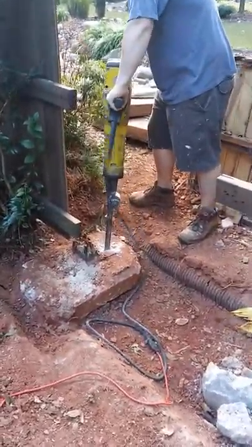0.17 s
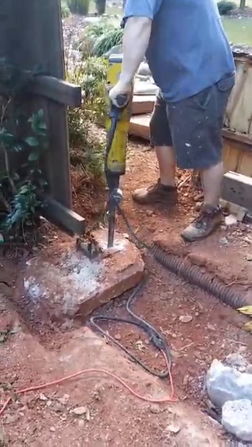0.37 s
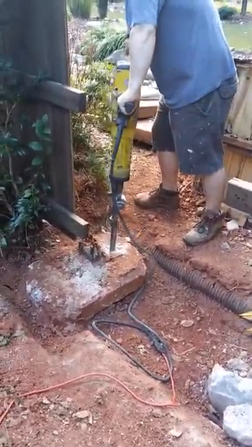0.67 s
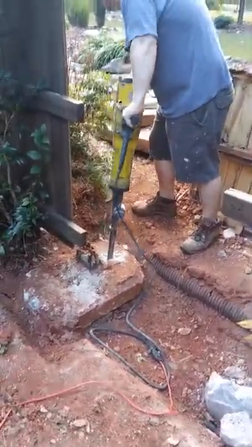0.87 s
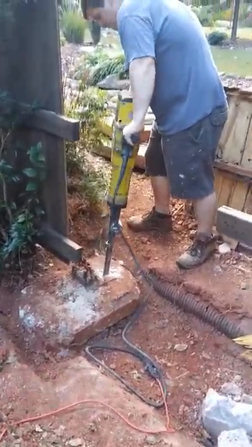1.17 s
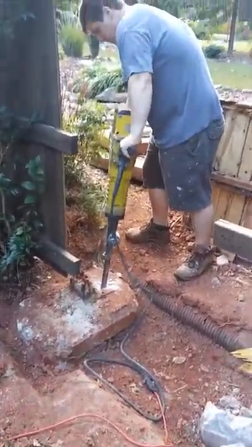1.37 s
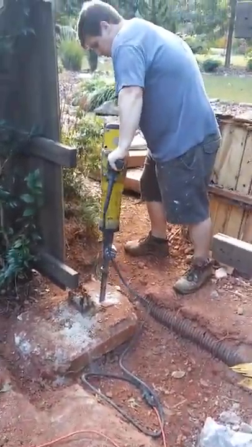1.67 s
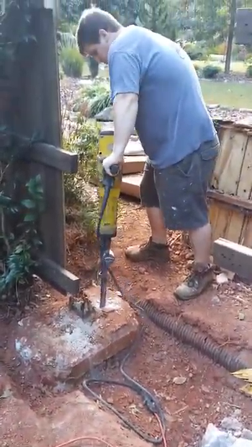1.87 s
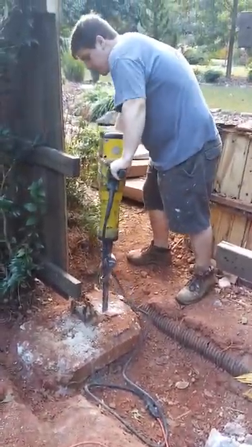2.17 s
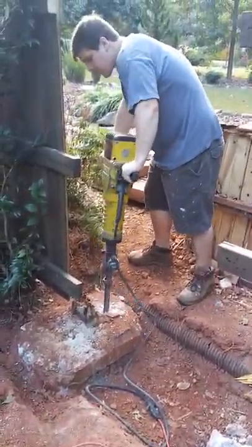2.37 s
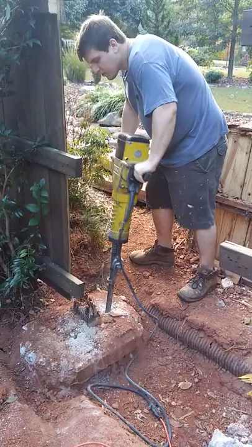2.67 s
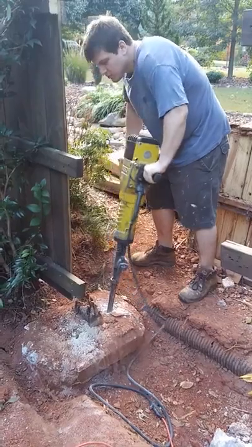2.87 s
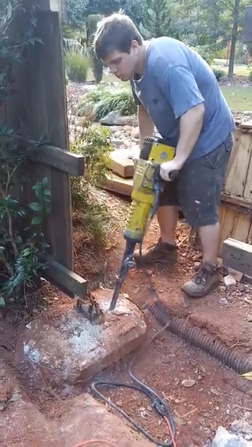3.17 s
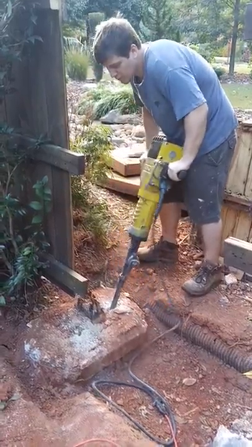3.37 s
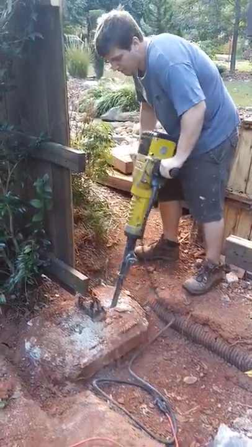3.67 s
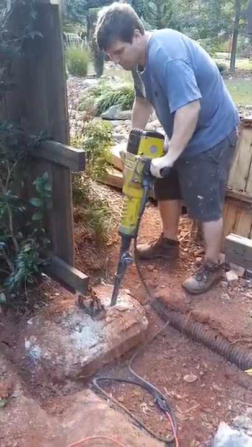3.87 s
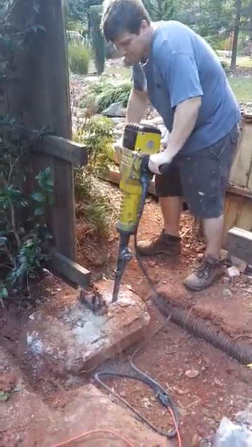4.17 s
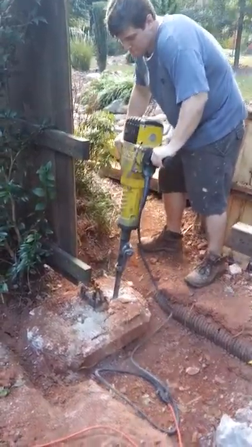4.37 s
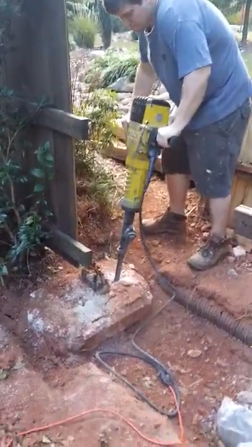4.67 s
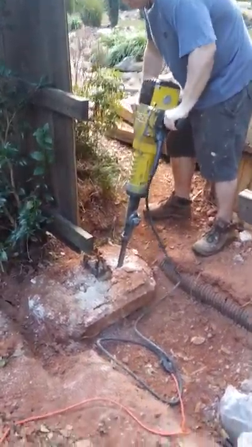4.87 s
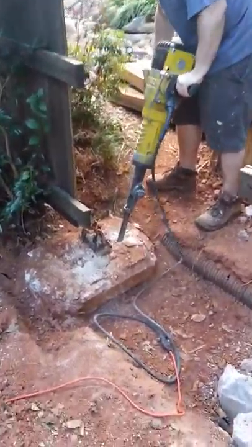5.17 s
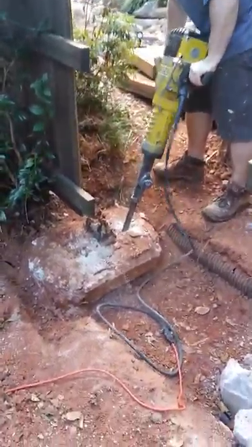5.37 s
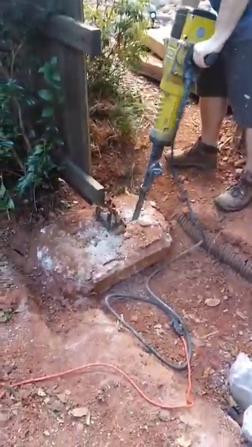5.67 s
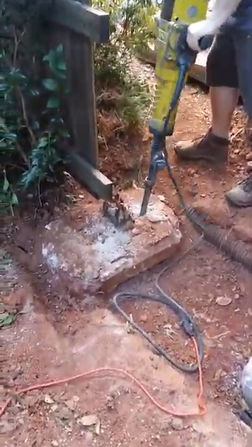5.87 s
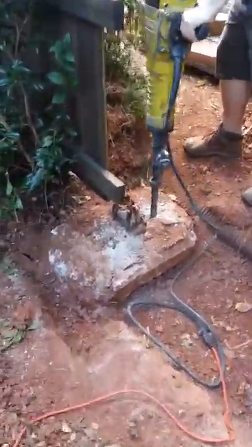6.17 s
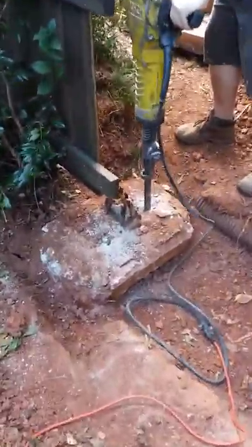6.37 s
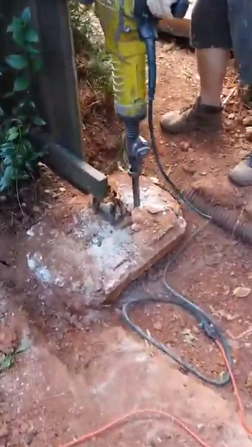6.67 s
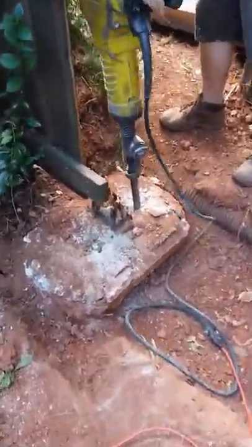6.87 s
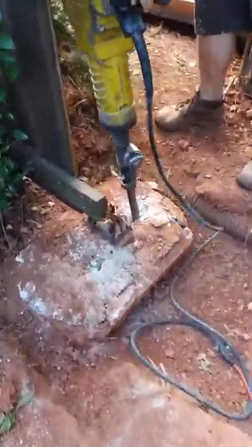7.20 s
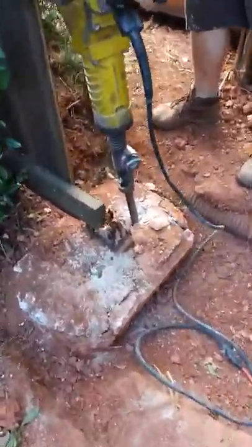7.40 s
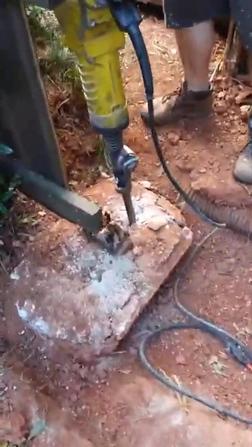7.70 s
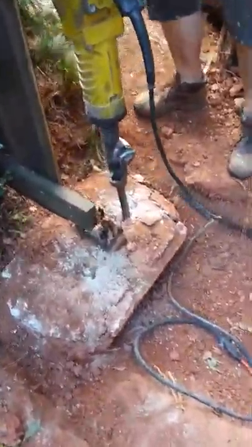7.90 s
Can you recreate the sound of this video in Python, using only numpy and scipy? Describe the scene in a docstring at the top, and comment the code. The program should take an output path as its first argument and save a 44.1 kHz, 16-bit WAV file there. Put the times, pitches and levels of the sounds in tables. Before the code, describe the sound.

Loud, close hammering of steel on concrete at about thirteen blows a second, with metallic ring and gear whine, before the machine coasts down.

```python
"""Rapid hammering, about 13 blows a second: an electric jackhammer breaks a concrete slab in a yard, then coasts down.
Each blow cracks on concrete (shaped noise), adds a dull low burst (impulses) and rings the steel bit and barrel.
Gear harmonics whine and sag on every compression stroke over fan noise; after switch-off the gears whirr in surges.
Loose clacks, falling chips, a low shudder and a faint yard complete it. The close microphone overloads softly,
and a look-ahead limiter ducks just before each peak."""
import sys
import numpy as np
from scipy import signal
from scipy.fft import rfft, irfft, next_fast_len
from scipy.io import wavfile
from scipy.ndimage import uniform_filter1d, minimum_filter1d

SR = 44100
rng = np.random.default_rng(int(sys.argv[2]) if len(sys.argv) > 2 else 0)


def put_to_file(sound):
    """Save the sound as 16-bit audio at rate SR, in the file named by the first command-line argument."""
    columns = np.atleast_2d(sound).T  # one column per channel
    safe = np.clip(columns, -1, 1)
    whole_steps = np.round(safe * 32767)
    wavfile.write(sys.argv[1], SR, whole_steps.astype(np.int16))


N = 354519
TIME = np.arange(N) / SR  # s

# All levels in the tables are relative.

# Pace of the crank, each value held until the next row: (time [s], rate [blows/s])
CRANK_PACE = [(-0.0363, 13.037), (0.3473, 12.696), (0.5048, 12.871), (1.4371, 12.737), (1.8297, 12.521),
              (3.1873, 12.971), (4.0354, 12.655), (4.4305, 12.855), (4.7417, 12.698), (5.4505, 13.079),
              (5.6798, 13.121), (6.2896, 12.731), (6.918, 11.364), (7.006, 9.033), (7.1167, 7.418),
              (7.2515, 5.092)]


def blow_times():
    """Crank kinematics: the striker lands each time the integrated rate completes a turn."""
    start_s, blows_per_s = np.transpose(CRANK_PACE)
    turns_per_row = blows_per_s[:-1] * np.diff(start_s)
    turns = np.concatenate([[0], np.cumsum(turns_per_row)])
    return np.interp(np.arange(round(turns[-1]) + 1), turns, start_s)


# Force of the striker, weakening as the motor slows: (time [s], level [dB])
STRIKER_FORCE = [(-.04, -4.5), (.03, -1.5), (7, 0.5), (7.12, -3), (7.25, -9)]
# Nominal modes of the steel bit, before shift and damping: (frequency [Hz], level [dB], decay by 60 dB [s])
BIT_MODES = [(4015, -28, .3), (4835, -17, .25), (5375, -19, .18), (6950, -1, .11), (7465, -17, .5),
             (8105, -17, .4), (8665, -14, .3), (9275, -11, .25), (9393, -8, .28), (10140, -14, .22),
             (10557, -13, .28), (11336, -27, .25), (11865, -23, .22), (12037, -15, .21), (14376, -30, .2),
             (14871, -21, .24), (15272, -25, .24)]
# How freely the low modes ring as the bit shifts in its seat: (time [s], level [dB])
LOW_MODE_RING = [(0.04, 3.5), (2.23, -1), (3.19, -0.5), (3.34, -4), (4.59, 3), (4.9, -3), (5.98, 1),
                 (6.29, -3.5), (7.12, -1)]
# The same for the high modes: (time [s], level [dB])
HIGH_MODE_RING = [(0.04, 7), (0.35, 2), (1.13, 10), (1.44, -11), (1.59, 3), (2.71, -1), (2.87, -1),
                  (3.34, 12), (3.96, 2), (5.53, 11), (6.29, -1), (6.45, 6), (6.6, 6), (6.92, 9.6),
                  (7.12, 6)]


def bit(level_db=-0.5, chatter_s=0.026, chatter=0.66, scatter_db=1.5, seating_db=1.5,
        high_damping=1.4, detune=.0018, beating=1.1):
    """Modal synthesis: each blow and its chatter on the slab excite modes that every new seating shifts slightly."""
    blows = blow_times()
    count = len(blows)
    ring_curves = np.array([curve(LOW_MODE_RING, blows), curve(HIGH_MODE_RING, blows)])
    low_db, high_db = ring_curves + seating_db * rng.standard_normal((count, 2)).T
    latest_blow = np.maximum(np.searchsorted(blows, TIME) - 1, 0)
    out = np.zeros(N)
    for hz, mode_db, t60 in BIT_MODES:
        # the blow itself, then two later contacts
        contacts = blows[:, None] + chatter_s * rng.random((count, 3)) * np.arange(3) / 2
        luck, shift = rng.standard_normal((count, 2)).T
        high_share = np.interp(hz, [9500, 11500], [0, 1])
        ring_db = high_share * (high_db - low_db) + low_db
        blow_gain = gain_of(mode_db + ring_db + curve(STRIKER_FORCE, blows) + scatter_db * luck)
        sizes = blow_gain[:, None] * np.array([1, chatter, chatter])
        shifted_hz = hz * (1 + detune * shift[latest_blow])
        out += mode(contacts, sizes, shifted_hz, t60 / high_damping ** high_share, beating)
    return gain_of(level_db) * out


def barrel(clang, level_db=2.5, t60=0.42, scatter_db=0.5):
    """High modal density: countless close modes act as decaying noise that lasts into the next blow."""
    blows = blow_times()
    blow_db = level_db + curve(STRIKER_FORCE, blows) + scatter_db * rng.standard_normal(len(blows))
    return clang * bursts(blows, blow_db, t60)


# Crack of steel on concrete: (frequency [Hz], spectral level [dB per Hz])
CRACK_SPECTRUM = [(60, -41), (200, 3.5), (600, 0.5), (2000, 1), (5000, 8.5), (9000, -5.5), (12000, 7),
                  (15500, -6.5)]
# Level of the dull low burst: (time [s], level [dB])
LOW_BURST_LEVEL = [(0.04, 2.5), (0.35, 7), (0.5, 1.5), (1.28, 5), (1.44, -2.5), (1.59, 3.5), (2.23, -0.5),
                   (2.39, 3.5), (2.71, -0.4), (4.11, 5.5), (4.27, 3), (4.43, -4), (5.21, 5), (5.37, 3),
                   (7.12, 2), (7.25, -18)]


def concrete(crack_db=0, crack_t60=0.12, low_burst_db=19, low_burst_s=.014,
             recoil_db=-41, recoil_s=0.037, scatter_db=1.2, count=14):
    """Impact noise: a sharp crack, a dull low burst as from an overloaded microphone, then a recoil thump."""
    blows = blow_times()
    blows = blows[blows > 0]
    force_db = curve(STRIKER_FORCE, blows)
    burst_db = curve(LOW_BURST_LEVEL, blows) + scatter_db * rng.standard_normal(len(blows))
    crack = bursts(blows, crack_db + force_db, crack_t60) * noise(CRACK_SPECTRUM)

    burst_times = blows[:, None] + low_burst_s * rng.random((len(blows), count))
    sizes = rng.standard_normal((len(blows), count))
    sizes /= sizes.std(1, keepdims=True)  # equal spread in every blow
    sizes *= gain_of(low_burst_db + burst_db + force_db)[:, None]
    low_burst = band(clicks(burst_times, sizes) + 1e-12, 203, 1350)
    low_burst = band(low_burst, 130, 3300)

    # the machine falls back on the bit
    thump = noise([(25, -18), (95, 5), (200, -12), (900, -50)])
    recoil = bursts(blows + recoil_s, recoil_db + force_db, 0.099) * thump
    return crack + low_burst + recoil


# Clacks of the loose bit as the machine runs down: (time [s], level [dB], decay by 60 dB [s])
LOOSE_CLACKS = [(7.4479, 0.5, 0.1), (7.747, -8.5, 0.093)]
# Modes of the bit holder: (frequency [Hz], level [dB], decay by 60 dB [s])
HOLDER_MODES = [(4070, -20, 0.1), (4720, -7, 0.047), (5679, -6.5, 0.037), (7700, -11, 0.094),
                (8027, -7.5, 0.11), (9362, -5, 0.076)]


def holder(clang, ring_db=1, clang_db=-5, crack_db=-5, after_db=-25, after_t60=0.79):
    """Free impact: the undriven bit clacks and excites the holder's modes; the barrel sings on faintly."""
    times, clack_db, _ = np.transpose(LOOSE_CLACKS)
    ring = np.zeros(N)
    for hz, mode_db, t60 in HOLDER_MODES:
        ring += mode(times, gain_of(clack_db + mode_db), hz, t60, beating=0.35)
    fade = sum(bursts([at], [peak_db], t60) for at, peak_db, t60 in LOOSE_CLACKS)
    barrel_fade = gain_of(clang_db) * fade + bursts(times, clack_db + after_db, after_t60)
    crack = fade * band(noise(CRACK_SPECTRUM), 150, 8100)
    return gain_of(ring_db) * ring + barrel_fade * clang + gain_of(crack_db) * crack


# Rush of the motor's fan and gears: (frequency [Hz], spectral level [dB per Hz])
RUSH_SPECTRUM = [(25, -30.5), (60, -23), (130, -16), (210, -3.5), (320, 2), (480, -8), (750, 0.5),
                 (1000, -2.5), (1600, 2), (3200, 3), (4600, 1.5), (5800, -5), (9000, -3.5), (15000, -30)]
# Motor noise under power, then dying away after switch-off: (time [s], level [dB])
MOTOR_LEVEL = [(0, -10.5), (1, -13.5), (4, -14.5), (6, -14.5), (6.6, -12), (7.1, -11), (7.22, -16),
               (7.25, -26), (7.6, -39), (8.04, -41)]
# Strength of the gear whine: (time [s], level [dB])
WHINE_LEVEL = [(0, -21.5), (1, -19), (2, -23.5), (3, -18.5), (3.7, -23), (4.3, -19.5), (4.8, -18.5),
               (5.3, -20.5), (6, -17), (6.8, -21), (7.2, -34), (7.6, -59), (8, -46)]
# One crank turn from blow to blow: (phase [share of turn], speed [factor], gear load [dB])
CRANK_STROKE = [(0, .92, 8.5), (.15, .96, -7.5), (.55, 1.03, -10.5), (.7, 1.025, 0.5), (.81, .995, 2),
                (.92, .94, 3.5), (1, .92, -13)]
# Harmonics of the gear mesh: (multiple of mesh frequency, level [dB])
MESH_HARMONICS = [(1, -8), (2, -12), (3, -2.5)]
# Resonances of the housing: (frequency [Hz], bandwidth [Hz], level [dB])
HOUSING_PEAKS = [(1560, 32, -12), (2257, 80, -0.5), (3000, 77, -11), (4796, 79, 5.5)]
MESHES_PER_BLOW = 127
SWITCH_OFF_S = 7.2


def motor(rush_db=-3, load_share=0.13, singing_share=0.45, flutter=0.00494,
          stroke_scatter_db=0.8, tooth_rough=0.51, patchy_db=4.0):
    """Gear-mesh frequency modulation: compressing the air cushion loads and slows the gears; the housing resonates."""
    # the last turn would end after the sound does
    turns_at = np.concatenate([blow_times(), np.transpose(LOOSE_CLACKS)[0], [8.35]])
    turns = np.interp(TIME, turns_at, np.arange(len(turns_at)))
    turns_per_s = np.interp(TIME, (turns_at[1:] + turns_at[:-1]) / 2, 1 / np.diff(turns_at))
    speed = curve(CRANK_STROKE, turns % 1)
    load_db = curve(CRANK_STROKE, turns % 1, axis=2)

    mesh_hz = MESHES_PER_BLOW * turns_per_s * speed * (1 + flutter * wander(200))
    angle = 2 * np.pi * np.cumsum(mesh_hz) / SR
    luck_db = stroke_scatter_db * rng.standard_normal(len(turns_at))[turns.astype(int)]
    teeth = np.zeros(N)
    for multiple, db in MESH_HARMONICS:
        # uneven teeth roughen every harmonic
        roughness = 1 + tooth_rough * wander(180)
        teeth += gain_of(db) * roughness * np.sin(round(multiple) * angle)
    whine = gain_of(curve(WHINE_LEVEL) + load_db + luck_db) * evened(teeth)

    powered = np.interp(TIME - SWITCH_OFF_S, [0, .1], [1, 0])
    running = gain_of(curve(MOTOR_LEVEL)) + coasting()
    level_db = 20 * np.log10(running) + rush_db + load_share * load_db * powered
    drive = whine + gain_of(level_db) * patchy(noise(RUSH_SPECTRUM), patchy_db)
    housing = np.zeros(N)
    for hz, width_hz, db in HOUSING_PEAKS:
        b, a = signal.iirpeak(hz, hz / width_hz, fs=SR)
        housing += gain_of(db) * signal.lfilter(b, a, drive)
    return drive + housing + singing(level_db + singing_share * load_db * powered, powered)


# Whirring surges of the coasting gears, one a slow piston stroke: (start [s], length [s], level [dB])
COASTING_SURGES = [(7.251, 0.1, -18), (7.352, 0.092, -22), (7.44, .14, -19), (7.59, 0.15, -34.5),
                   (7.726, 0.047, -31), (7.783, 0.19, -30.5)]


def coasting(peak_share=0.33, roundness=0.8):
    """Amplitude modulation: each slow stroke makes the gain swell to a peak and sink again."""
    gain = np.zeros(N)
    for start_s, length_s, db in COASTING_SURGES:
        arch = np.interp((TIME - start_s) / length_s, [0, np.clip(peak_share, .1, .9), 1], [0, 1, 0])
        gain += gain_of(db) * np.sin(np.pi / 2 * arch) ** roundness
    return gain


# Sharp casing resonances:
# (frequency [Hz], sway rate [points/s], level under power [dB], level while coasting [dB])
CASING_RESONANCES = [(2277, 130, -15, -6), (4843, 60, -3.5, -13)]


def singing(drive_db, powered):
    """Sustained resonance: gear drive keeps the casing ringing, as tones of randomly swaying amplitude and phase."""
    out = np.zeros(N)
    for hz, points_per_s, powered_db, coasting_db in CASING_RESONANCES:
        sway = wander(points_per_s) + 1j * wander(points_per_s)
        level_db = drive_db + powered * powered_db + (1 - powered) * coasting_db
        out += gain_of(level_db) * (sway * np.exp(2j * np.pi * hz * TIME)).real
    return out


# Small chips of concrete settling: (time [s], level [dB])
CHIP_TICKS = [(7.86, -54), (7.909, -27), (7.954, -35), (7.995, -38), (8.009, -29)]


def chips(t60=0.028):
    """Light impacts: small chips give tiny bright bursts of noise."""
    times, db = np.transpose(CHIP_TICKS)
    tick = noise([(1000, -30), (5000, -16), (6200, -14), (8300, 9), (10500, -11), (15500, -15)])
    return bursts(times, db, t60) * tick


# Low hum of the last slow turns: (time [s], level [dB])
HUM_LEVEL = [(7.6, -75), (7.9, -65), (8.0, -48), (8.04, -42)]


def shake(level_db=-41, hum_hz=210):
    """Forced vibration: the driven machine shudders as low noise, and hums on one tone in its last turns."""
    powered = np.interp(TIME, [7.1, 7.35], [1, .15])
    rumble = noise([(20, -16), (50, -19), (90, 2.0), (170, -3), (400, -8), (1500, -60)])
    shudder = gain_of(level_db) * powered * rumble
    hum = np.sqrt(2) * np.sin(2 * np.pi * hum_hz * TIME)  # rms 1
    return shudder + gain_of(curve(HUM_LEVEL)) * hum


def yard(level_db=-53):
    """Stationary ambient noise: a faint outdoor background of fixed spectrum."""
    air = noise([(30, -16), (120, -4), (220, -6), (500, 12), (2000, -3), (8000, -35), (15000, -26)])
    return gain_of(level_db) * air


def gain_of(db):
    """Decibel law: 20 dB is a factor of ten in amplitude."""
    return 10 ** (np.asarray(db) / 20)


def evened(x):
    """Power normalization: scales to rms 1."""
    return x / np.sqrt(np.mean(x ** 2) + 1e-20)


def curve(rows, at=TIME, axis=1):
    """Linear interpolation: joins the rows of a table by straight lines."""
    rows = np.asarray(rows, float)
    return np.interp(at, rows[:, 0], rows[:, axis])


def noise(spectrum):
    """Spectral shaping: weights the transform of white noise, then scales to rms 1."""
    size = next_fast_len(N, True)
    hz, db = np.transpose(spectrum)
    log_hz = np.log(np.fft.rfftfreq(size, 1 / SR) + 1)
    shape = gain_of(np.interp(log_hz, np.log(hz), db))
    white = rng.standard_normal(size)
    return evened(irfft(rfft(white) * shape, size)[:N])


def clicks(times, sizes):
    """Impulsive excitation: single impulses at the given times."""
    train = np.zeros(N, np.asarray(sizes).dtype)
    places = np.clip(np.ravel(times) * SR, 0, N - 1).astype(int)
    np.add.at(train, places, np.ravel(sizes))
    return train


def dying(train, t60):
    """Exponential damping: every impulse leaves a tail that shrinks a thousandfold in t60 seconds."""
    return signal.lfilter([1], [1, -np.exp(-np.log(1000) / (t60 * SR))], train)


def bursts(times, db, t60):
    """Incoherent addition: envelope of decaying bursts whose powers add."""
    # power shrinks a thousandfold in half the time that amplitude does
    return np.sqrt(dying(clicks(times, gain_of(db) ** 2) + 1e-18, t60 / 2))


def mode(times, sizes, hz, t60, beating=0, beats_per_s=70):
    """Damped oscillator struck with random phase; close neighbours and echoes make it swell and fade."""
    kicks = sizes * np.exp(2j * np.pi * rng.random(np.shape(sizes)))
    ring = dying(clicks(times, kicks) + 1e-12, t60)
    cycles = np.cumsum(hz * np.ones(N)) / SR
    angle = (2 * np.pi * (cycles % 1)).astype(np.float32)
    sway = wander(beats_per_s) + 1j * wander(beats_per_s)
    ring = ring * (1 + beating * sway) / np.sqrt(1 + 2 * beating ** 2)
    return np.sqrt(2) * (ring.real * np.cos(angle) - ring.imag * np.sin(angle))


def band(x, low_hz, high_hz):
    """Causal band-pass filtering, steeper on the low side."""
    x = signal.sosfilt(signal.butter(2, low_hz, "high", fs=SR, output="sos"), x)
    return signal.sosfilt(signal.butter(1, high_hz, fs=SR, output="sos"), x)


def wander(per_s):
    """Random modulation: joins per_s random points a second by lines, with rms about 1."""
    points = rng.standard_normal(2000)
    return np.interp(TIME * per_s, np.arange(len(points)), points) * np.sqrt(3 / 2)


def patchy(x, depth_db):
    """Time-frequency modulation: patches of about 300 Hz by 12 ms flare and fade at random, making noise grainy."""
    z = signal.stft(x, nperseg=512, noverlap=384)[2]
    patches = uniform_filter1d(rng.standard_normal(z.shape), size=4, axis=0)
    patches = uniform_filter1d(patches, size=4, axis=1)
    z = z * gain_of(depth_db * evened(patches))
    return evened(signal.istft(z, nperseg=512, noverlap=384)[1][:N])


# Dense ring of the steel barrel: (frequency [Hz], spectral level [dB per Hz])
CLANG_SPECTRUM = [(1500, -25), (4000, -21.5), (6000, -15.5), (6700, -11.5), (7300, -5), (7850, 0),
                  (8700, 1), (9300, -2), (9750, -7), (10300, -3), (11100, -14), (12500, -15),
                  (13600, -15.5), (15500, -26)]


def scene(patchy_db=3.5):
    """Superposition: all sources add at one microphone, the same in both channels."""
    clang = patchy(noise(CLANG_SPECTRUM), patchy_db)
    mono = bit() + barrel(clang) + concrete() + holder(clang) + chips() + motor() + shake() + yard()
    return np.array([mono, mono])


def limiter(x, ceiling_db=-2, release_db_per_s=420, size=150):
    """Look-ahead gain control: ducks a few milliseconds before each peak and recovers quickly."""
    over_db = np.maximum(20 * np.log10(abs(x) + 1e-9) - ceiling_db, 0)
    # largest excess within the next size samples
    ahead_db = -minimum_filter1d(-over_db, size, origin=-(size // 2))
    fall_db = TIME * release_db_per_s
    held_db = np.maximum.accumulate(ahead_db + fall_db) - fall_db
    smooth_db = uniform_filter1d(held_db, size // 2, origin=-(size // 4))
    return x / gain_of(smooth_db)


def record(dry, overload_db=6, low_cut_hz=42, edge_hz=15800):
    """Saturation: the microphone rounds off large peaks and sheds deep bass; then limiter and band limit."""
    low_pass = signal.firwin(511, edge_hz, window=("kaiser", 9), fs=SR)
    rounded = gain_of(overload_db) * np.tanh(dry[0] / gain_of(overload_db))
    thinned = signal.sosfilt(signal.butter(1, low_cut_hz, "high", fs=SR, output="sos"), rounded)
    # the band limit acts both before and after the limiter
    limited = limiter(signal.oaconvolve(thinned, low_pass, "same"))
    mono = signal.oaconvolve(limited, low_pass, "same")
    return np.array([mono, mono])


dry = scene()
out = record(dry)
put_to_file(out)
```